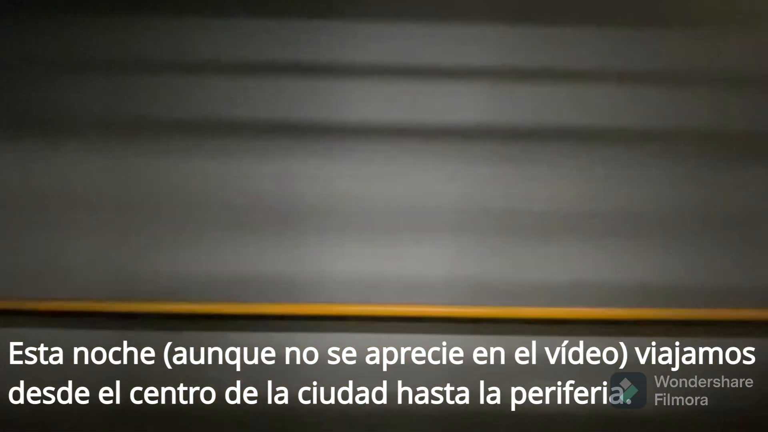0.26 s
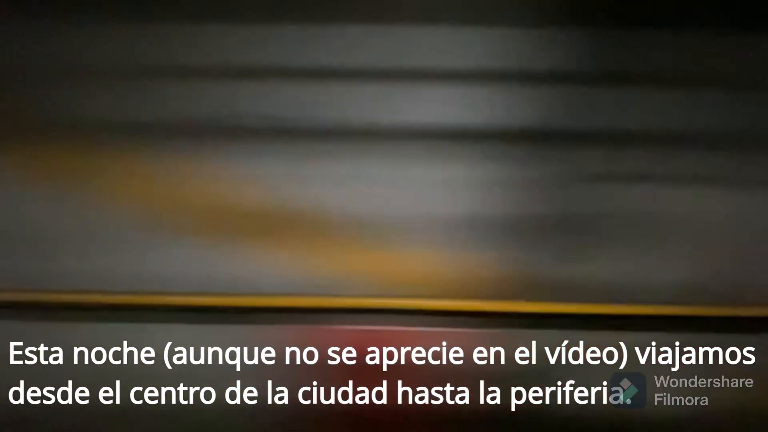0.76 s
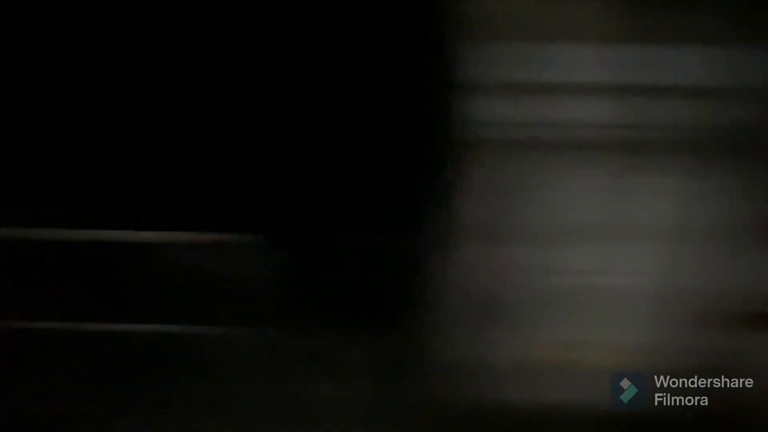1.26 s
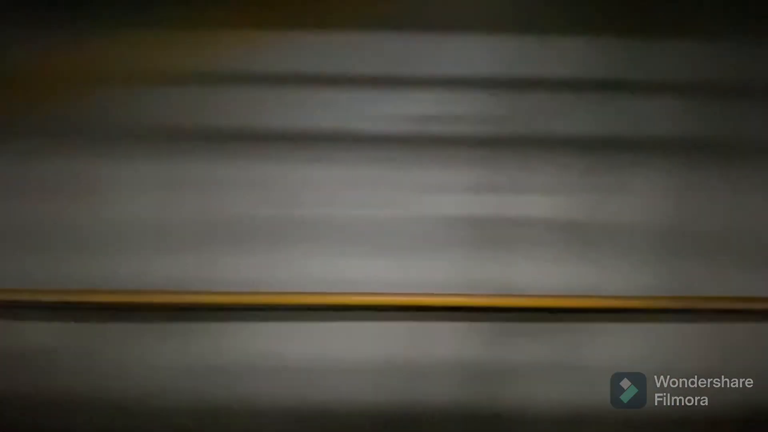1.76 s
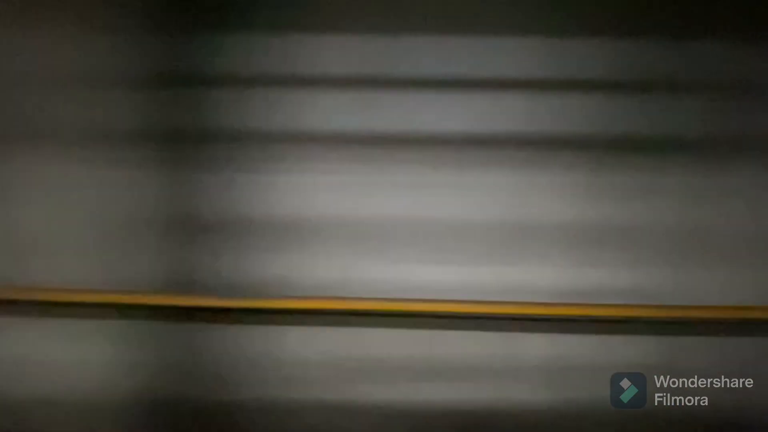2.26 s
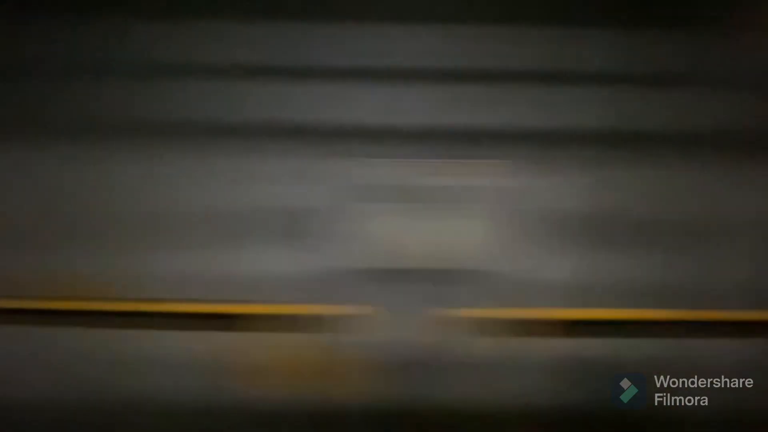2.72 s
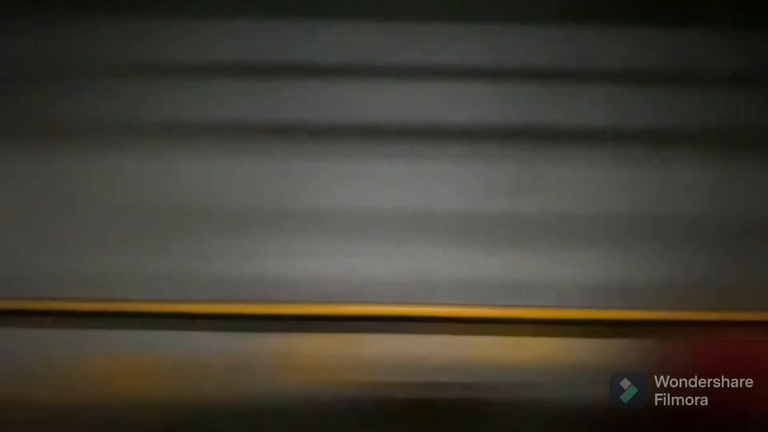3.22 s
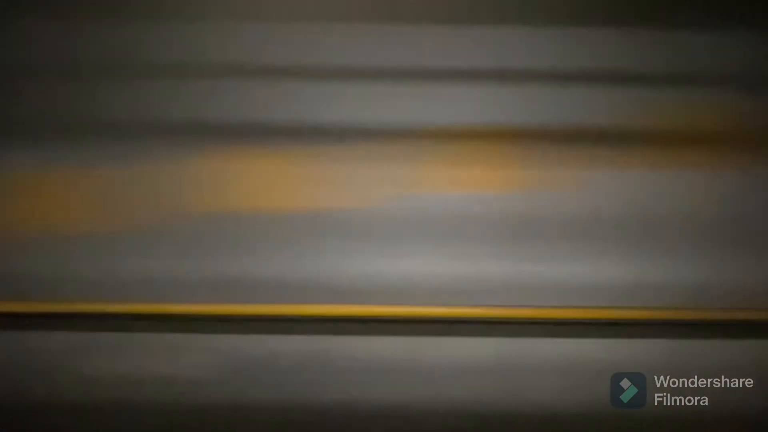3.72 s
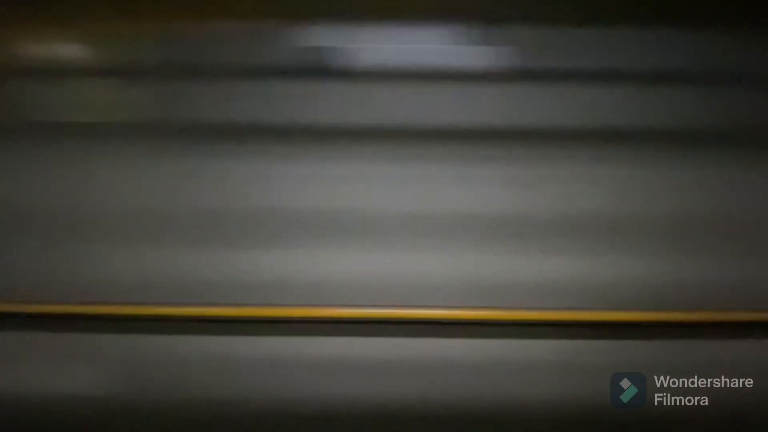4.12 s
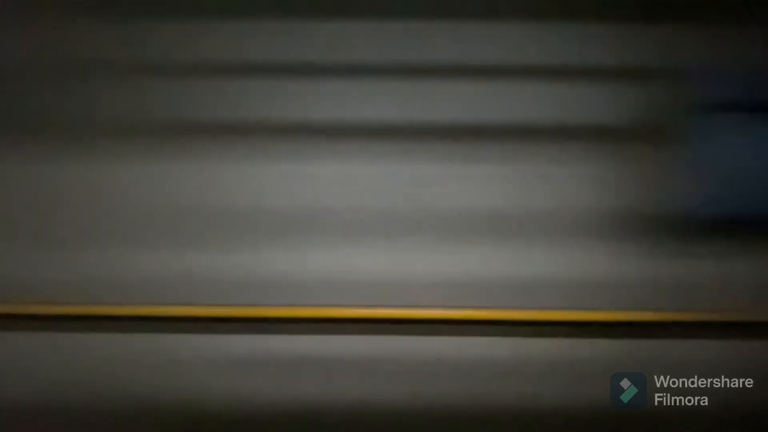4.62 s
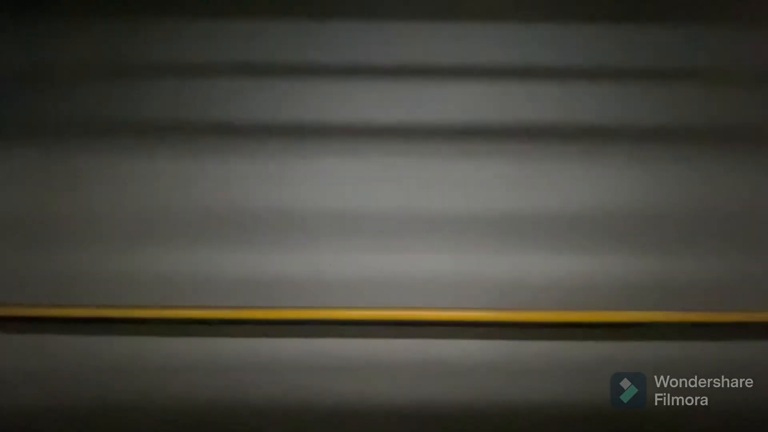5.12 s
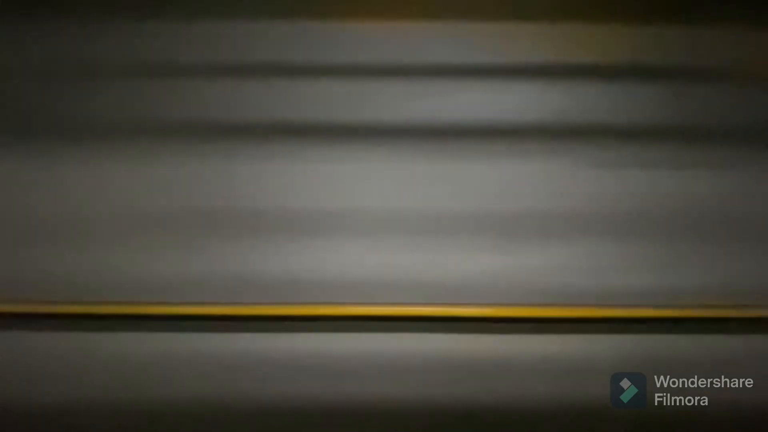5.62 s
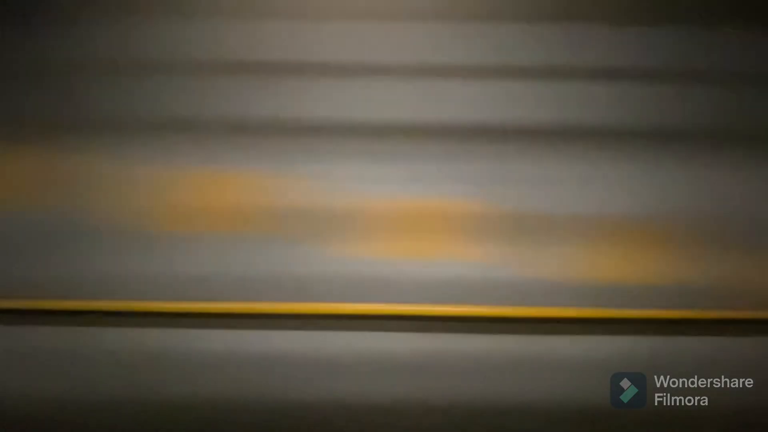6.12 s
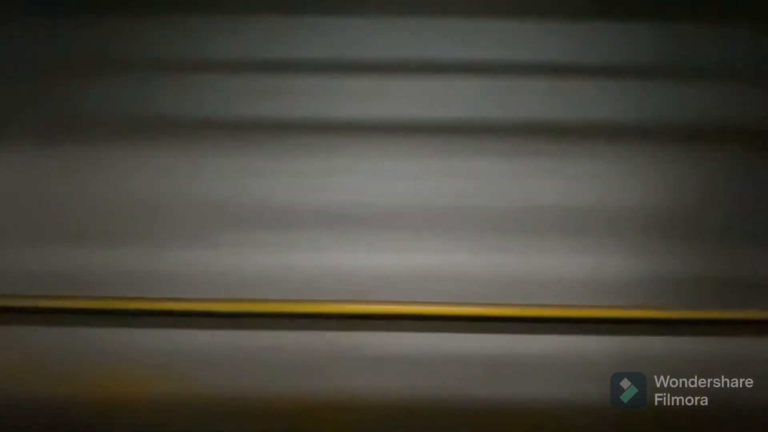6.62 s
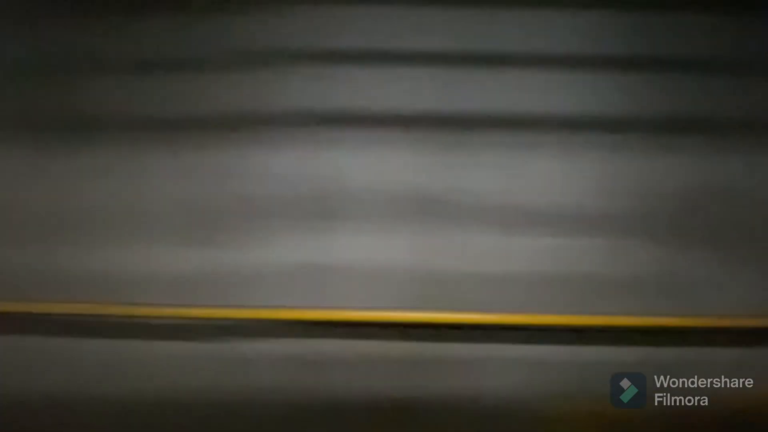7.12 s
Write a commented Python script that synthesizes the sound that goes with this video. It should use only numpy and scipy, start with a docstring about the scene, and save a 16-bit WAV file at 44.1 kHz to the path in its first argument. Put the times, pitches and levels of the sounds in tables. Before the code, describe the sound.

A subway train runs fast through a tunnel, heard inside the carriage from a handheld stereo microphone near the window. From 0 s to the end, about 7.4 s, a loud, dense roar of rough wheels on rails never stops. Its weight is in the low mids: floor, doors and panels ring as blurred, hollow drones that waver in pitch and swell irregularly, with weaker deep rumble below. Above lies a quieter airy hiss, flickering quickly as the tunnel wall throws it back. Around 1.1 s an opening passes, the boxy floor and door ringing dips and lower rumble shows briefly. Near 3 to 4 s the floor tone leans higher, then settles. A very faint, high flange squeak comes at 3.3 s, another at 5.8 s, and a clearer, rough metallic squeal at 6.4 s, leaning left, dropping in pitch and ringing on briefly. The roar continues to the cut.

```python
"""Inside a subway carriage in a tunnel, a two-port phone held at the window.
From the start, rough wheels on rough rails shake bogie, floor and panels: noise through drifting resonances,
over a broad roar and a flickering hiss that the tunnel wall throws back. Near 1.1 s an opening in the wall
goes by and the balance of the parts changes. Near 3.3, 5.8 and 6.4 s a wheel flange squeals briefly: narrow
noise bands that sag in pitch and ring on."""
import sys
import numpy as np
from scipy import signal
from scipy.fft import rfft, irfft, next_fast_len
from scipy.io import wavfile
from scipy.ndimage import uniform_filter1d, minimum_filter1d, map_coordinates

SR = 44100
rng = np.random.default_rng(int(sys.argv[2]) if len(sys.argv) > 2 else 0)


def store_pcm(level_fs):
    """Save levels as 16-bit WAV."""
    pcm = np.round(np.clip(level_fs, -1, 1) * 32767).astype(np.int16)
    wavfile.write(sys.argv[1], SR, np.atleast_2d(pcm).T)


N = 325017  # samples

# Modes of each part. Each row: centre in Hz, width in Hz, level within the part in dB.
BOGIE = [(79.3, 17, 0.5), (67, 13, -7.5)]
UNDERFRAME = [(130, 56, 0)]
AXLES = [(163.5, 26, 0)]
LOW_FLOOR = [(251, 44, -5.5), (286.1, 46.5, -0.5)]
HIGH_FLOOR = [(328.2, 18.8, 0), (349.6, 26, -6)]
DOORS = [(387.7, 62, 0)]
PANELS = [(507, 74, 0)]
UPPER_PANELS = [(574.4, 77, 0)]
WINDOW = [(648, 89, 0)]
RAILS = [(786, 74, -1.3), (833, 95, -0.23)]
MID_RAILS = [(982, 95, -1.5), (1045.5, 85, 0)]
HIGH_RAILS = [(1260, 140, 0)]
WHEELS = [(1489, 240, 0)]
# How hard each part rings. Each row: modes, level midway in dB, drift in dB per s, dB per dB of wall level,
# dB per unit of floor lean, dB added at the opening.
PARTS = {"bogie": (BOGIE, -42, -1.7, .1, .3, 1.5), "low floor": (LOW_FLOOR, -20.5, -0.35, 0.35, -2.5, -1.8),
         "high floor": (HIGH_FLOOR, -21.5, -0.11, 0.38, 3.2, -5.5),
         "doors": (DOORS, -27, -1.1, 0.71, 0.27, -3.5), "walls": (PANELS, -31, -0.49, .6, -1.6, .3),
         "upper walls": (UPPER_PANELS, -32.5, -0.8, 0.66, -1.4, .3),
         "rails": (RAILS, -30.5, -0.6, 1, -1.2, -1.3), "mid rails": (MID_RAILS, -34, -0.6, 0.83, .3, 1.3),
         "high rails": (HIGH_RAILS, -37.5, -0.46, 0.79, -0.3, .3),
         "wheels": (WHEELS, -42, 0.92, .8, .3, -.3), "underframe": (UNDERFRAME, -43.5, -0.52, .1, -.6, 13),
         "axles": (AXLES, -42.5, -.2, .1, .3, 2.5), "window": (WINDOW, -37, 0.38, .6, 3.4, -0.33)}
# Swells of one part: its ringing grows louder for a moment.
# Each row: centre in seconds, half length in seconds, part, swell in dB.
SWELLS = [(0.75, 0.2, "bogie", 4.5), (3.6, .25, "bogie", 2), (2.7, 0.072, "high floor", 3.5),
          (3.62, 0.12, "high floor", 1), (4.5, .08, "high floor", 3.5), (4.3, .15, "high floor", 1.5),
          (6.1, 0.27, "high floor", 2.5), (7.1, 0.22, "high floor", 0), (.4, 0.3, "rails", 2),
          (2.3, .25, "rails", 2.5), (2.3, .3, "mid rails", 2), (4.7, .25, "mid rails", 1.5),
          (5.1, .3, "high rails", 4.5), (6.7, .25, "high rails", 1), (0.59, 0.52, "upper walls", 3),
          (5.7, .3, "upper walls", 5), (1.8, .3, "low floor", 1.5), (3.0, 0.25, "axles", 3),
          (0.49, 0.32, "low floor", 3), (2.7, 0.13, "low floor", 3), (1.3, 0.27, "doors", 4.5),
          (2.45, 0.62, "doors", 5.5), (6.76, 0.31, "doors", 6.5), (7.27, 0.32, "doors", 6),
          (0.28, 0.26, "doors", 2.5), (7.1, .25, "low floor", 1.5), (2.1, 0.32, "bogie", 3.5),
          (2.45, 0.39, "walls", 3), (5.6, 0.23, "walls", 2), (5.3, 0.3, "rails", 3.5),
          (6.85, .5, "wheels", 3.5), (3.9, 0.25, "window", 3.5), (5.1, .25, "window", 6),
          (5.6, .4, "underframe", 1.5)]
# Pitch of some parts along the ride. Each row: time in seconds, shift in percent.
GLIDES = {"upper walls": [(0, 2), (.6, 0), (1.3, -3), (2.3, -4), (3.3, 5), (5.6, 8), (7.37, 3)],
          "rails": [(0, 1), (1.3, -3), (2.1, 2), (2.9, -3), (3.8, 2), (5.3, 1), (6.5, 0), (7.37, 1.5)],
          "mid rails": [(0, 3), (1.5, 4), (2.1, -1), (3.1, -1), (4.1, 1), (4.7, -1), (7.37, -1)],
          "high rails": [(0, 1), (1.2, -1.5), (2.5, 0), (4.7, 1.5), (5.5, 0), (7.37, 1)],
          "high floor": [(0, 0.94), (3.1, 1.42), (3.9, -1), (4.4, 2), (7.37, 0.014)], "bogie": [(0, 0),
          (.6, 1), (1.1, -6), (1.6, 1), (2.3, 1), (2.7, -7), (3.5, 2), (7.37, 0.5)]}
MIDWAY_S = 3.7
OPENING_S, OPENING_HALF_S = 1.12, 0.17  # centre, half length


def ringing_parts(wall_db, lean):
    """Each part rings at a level set by drift, wall, floor lean, opening and swells."""
    since_midway_s = np.arange(N) / SR - MIDWAY_S
    opening = bump(OPENING_S, OPENING_HALF_S)
    mix = 0
    for name, (modes, db, drift_db_per_s, wall_share, lean_db, opening_db) in PARTS.items():
        level_db = db + drift_db_per_s * since_midway_s + wall_share * wall_db
        level_db = level_db + lean_db * lean + opening_db * opening
        for at_s, half_s, part, swell_db in SWELLS:
            if part == name:
                level_db = level_db + swell_db * bump(at_s, half_s)
        shift_percent = in_time(GLIDES[name])[0] if name in GLIDES else 0
        mix = mix + undb(level_db) * glide(ring(modes), shift_percent)
    return mix


def ring(modes):
    """Every mode of a part swells and wavers on its own, by chance."""
    total = 0
    for hz, width_hz, db in modes:
        waver_db = .6 * walk(2.49) + 0.95 * walk(8) + .7 * walk(19)
        total = total + undb(db + waver_db) * mode(hz, width_hz)
    return unit(total)


def mode(center_hz, width_hz, size=N):
    """Noise through one resonance with steep flanks."""
    return shaped(lambda hz: 1 / (1 + ((hz - center_hz ** 2 / hz) / width_hz) ** 2), size)


WAVER_PERCENT, WAVERS_PER_S = 1.2, 5


def glide(pair, percent):
    """Reading faster or slower shifts the pitch by this much, wavering around it."""
    speed = 1 + (percent + WAVER_PERCENT * walk(WAVERS_PER_S)) / 100
    place = np.cumsum(speed)
    return np.array([map_coordinates(v, [place], order=1, mode="mirror") for v in pair])


# Roar under the modes. Each row: frequency in Hz, relative density in dB per Hz.
ROAR = [(20, -34.5), (48, -4), (100, -11.5), (140, -6), (190, 1.5), (450, 2), (680, -1), (1100, -3.5),
        (1500, -16), (2400, -51.5), (15000, -100)]
ROAR_DB = -25.5


def roar(wall_db):
    """Broad rolling noise that swells with the hiss: both come back from the tunnel wall."""
    return undb(ROAR_DB + 0.98 * wall_db) * coloured(ROAR)


# Wheel and air noise back from the wall. Each row: frequency in Hz, relative density in dB per Hz.
HISS = [(900, -24.5), (1400, -10.5), (1750, -6), (2100, -5.5), (2600, -16), (3000, -19), (3250, -14.5),
        (3700, -25.5), (4400, -22.5), (5500, -28.5), (7500, -31.5), (9000, -37.5), (10500, -40.5),
        (15000, -59)]


def hiss(hiss_db):
    """Wheel and air noise thrown back by the wall, flickering overall and band by band."""
    return undb(hiss_db + .5 * flicker(10)) * gusty(coloured(HISS))


# Hiss bands that flicker alone. Each row: low edge in Hz, high edge in Hz, flickers per s, depth in dB.
GUSTS = [(1300, 1710, 9.9, 2.5), (1760, 2300, 9, 1.1), (2320, 2900, 9, 0.85), (2900, 3600, 9, 0.85),
         (3620, 4600, 10, 1.1), (4600, 5400, 10, 0.9), (6000, 8500, 12, 1.3), (8500, 9700, 14, 1.5),
         (9700, 11000, 14, 1.5), (11000, 12400, 14, 1.5)]


def gusty(noise):
    """Gusts past the window make each band of the hiss flicker alone."""
    out = noise
    for low_hz, high_hz, rate_per_s, depth_db in GUSTS:
        sos = signal.butter(2, [low_hz, high_hz], "band", fs=SR, output="sos")
        band = signal.sosfiltfilt(sos, noise)
        out = out + (undb(depth_db * flicker(rate_per_s)) - 1) * band
    return out


# Tunnel ride. Each row: time in seconds, level thrown back by the wall in dB,
# lean of the floor ring: negative favours its low modes, positive its high modes.
RIDE = [(0, -37.5, -0.17), (.55, -37, -0.87), (.9, -39, -0.83), (1.5, -38, -.4), (2.05, -40, -0.77),
        (2.6, -38.5, -0.23), (3.0, -39, 0.9), (3.5, -39.5, 1.3), (4.2, -39, 0.7), (4.7, -38.5, -0.09),
        (5.1, -40, 0.05), (5.6, -38, 0.076), (6.1, -39, -0.27), (6.6, -39.5, -0.33), (7.37, -40, -0.39)]


def carriage():
    """Parts, roar and hiss as two unrelated mixes of reflections."""
    hiss_db, lean = in_time(RIDE)
    wall_db = hiss_db - hiss_db.mean()
    return ringing_parts(wall_db, lean) + roar(wall_db) + hiss(hiss_db)


# Flange squeals. Each row: start in seconds, hold in seconds, centre in Hz, width in Hz, level in dB,
# left minus right in dB.
SQUEALS = [(3.24, 0.051, 8900, 420, -69, -5), (5.81, .04, 8800, 420, -64, -4),
           (6.364, 0.11, 7430, 300, -50.5, 6), (6.442, .02, 6760, 200, -62, 9),
           (6.468, 0.035, 4450, 600, -55.5, 10), (6.46, 0.018, 5900, 900, -61, 5)]
# Wheel modes in a squeal. Each row: offset in squeal widths, level in dB. Then mode width as share of squeal width.
SQUEAL_MODES, SQUEAL_MODE_SHARE = [(-.42, -2.5), (0, 3), (.4, -3)], .3
SQUEAL_RISE_S, SQUEAL_FALL_S = .028, .06  # fall: time per 20 dB
SQUEAL_TAIL_DB, SQUEAL_TAIL_S = -9, .25  # tail: time per 20 dB
SQUEAL_TAIL_SHIFT, SQUEAL_TAIL_SPREAD = -.5, 1.6  # in squeal widths: lower, more blurred
SQUEAL_SAG_PER_S = .04  # share of pitch lost per s


def squeals():
    """Stick-slip at the flange: close, rough wheel modes swell, hold, sag and die in the tunnel."""
    out, size = np.zeros((2, N)), SR // 2
    t = np.arange(size) / SR
    sagging_place = (t - SQUEAL_SAG_PER_S * t ** 2 / 2) * SR
    for start_s, hold_s, hz, width_hz, db, pan_db in SQUEALS:
        after_s = np.maximum(t - SQUEAL_RISE_S - hold_s, 0)
        rise = np.clip(t / SQUEAL_RISE_S, 0, 1) ** 2
        wheel = 0
        for offset, mode_db in SQUEAL_MODES:
            wheel = wheel + undb(mode_db) * mode(hz + offset * width_hz, SQUEAL_MODE_SHARE * width_hz, size)
        band = np.array([map_coordinates(v, [sagging_place]) for v in unit(wheel)])
        direct = rise * undb(-20 * after_s / SQUEAL_FALL_S) * band
        build = np.clip(t / (SQUEAL_RISE_S + hold_s), 0, 1)
        tail = mode(hz + SQUEAL_TAIL_SHIFT * width_hz, SQUEAL_TAIL_SPREAD * width_hz, size)
        echo = build * undb(SQUEAL_TAIL_DB - 20 * after_s / SQUEAL_TAIL_S) * tail
        side_db = np.array([[pan_db], [-pan_db]]) / 2
        start = int(start_s * SR)
        out[:, start:start + size] += undb(db + side_db) * (direct + echo)
    return out


# The two ports. Each row: frequency in Hz, likeness 0-1, left lag in ms, left minus right in dB.
PORTS = [(40, .93, .1, 0.5), (124, 0.9, .1, -0.5), (190, .58, .1, 2.5), (255, 0.87, 0.033, 2.5),
         (484, 0, 0.21, .5), (660, 0.38, 0.68, 2), (825, 0.18, 0.41, 3), (1120, 0.1, 0.043, 4),
         (1510, 0.5, 0.24, 3.5), (2050, 0.33, 0.24, 2.5), (2700, 0.9, 0.36, 0), (3200, 0.7, 0.36, 3),
         (3520, 0.6, 0.41, 1.5), (4440, 0.2, 0.37, 3.5), (4670, 0.5, 0.47, -0.5), (5300, .2, .42, 4.5),
         (7000, 0.3, .43, 2.5), (8800, 0.4, 0.45, -0.5), (11000, 0.5, 0.53, -0.5)]


def ports(pair):
    """The right port hears a share of the left's sound slightly earlier, other reflections for the rest."""
    edge = 4096  # samples of mirrored padding
    size = next_fast_len(N + 2 * edge)
    hz = np.arange(size // 2 + 1) * SR / size
    alike, lag_ms, pan_db = on_log_hz(hz, PORTS)
    alike = np.clip(alike, 0, 1)
    padded = np.pad(pair, ((0, 0), (edge, edge)), "reflect", reflect_type="odd")
    left, other = rfft(padded, size)
    early = left * np.exp(2j * np.pi * hz * lag_ms / 1000)
    right = alike * early + np.sqrt(1 - alike ** 2) * other
    return irfft([left * undb(pan_db / 2), right * undb(-pan_db / 2)], size)[:, edge:edge + N]


def undb(db):
    """Amplitude from dB."""
    return 10 ** (np.asarray(db) / 20)


def unit(x):
    """Scale to rms 1."""
    return x / np.sqrt(np.mean(x ** 2))


def on_log_hz(hz, table):
    """Columns of a (Hz, ..) table, joined by straight lines on a log-frequency axis."""
    at_hz, *columns = np.transpose(table)
    return [np.interp(np.log(hz + 1), np.log(at_hz), c) for c in columns]


def in_time(table):
    """Columns of a (s, ..) table, one value a sample."""
    at_s, *columns = np.transpose(table)
    return [np.interp(np.arange(N) / SR, at_s, c) for c in columns]


def shaped(gain, size=N):
    """Two unrelated noises through one spectrum, rms 1."""
    fast = next_fast_len(size)
    hz = np.arange(fast // 2 + 1) * SR / fast
    real, imag = rng.standard_normal((2, 2, len(hz)))
    return unit(irfft((real + 1j * imag) * gain(hz + 1), fast)[:, :size])


def coloured(table):
    """Two unrelated noises with a tabled spectrum."""
    return shaped(lambda hz: undb(on_log_hz(hz, table)[0]))


def walk(rate_per_s):
    """Random levels at this rate, joined and slewed; spread near 1."""
    step = int(SR / rate_per_s)
    count = N // step + 2
    joined = np.interp(np.arange(N) / step, np.arange(count), rng.standard_normal(count))
    return 1.62 * uniform_filter1d(joined, step)


def flicker(rate_per_s):
    """A walk without its slow drift."""
    quick = walk(rate_per_s)
    return quick - uniform_filter1d(quick, SR // 3)


def bump(at_s, half_s):
    """A smooth rise and fall around a moment, 1 at the top."""
    return np.exp(-((np.arange(N) / SR - at_s) / half_s) ** 2)


def scene():
    """Carriage through the ports, squeals on top."""
    return ports(carriage()) + squeals()


CEILING, TOP_HZ = .92, 12400


def record(dry):
    """The phone's limiter eases the gain down around peaks over the ceiling; then the top is cut."""
    span = int(.012 * SR)
    need = CEILING / np.maximum(np.abs(dry).max(axis=0), CEILING)
    held = minimum_filter1d(need, 2 * span + 1)
    gain = uniform_filter1d(uniform_filter1d(held, span), span)
    low_pass = signal.ellip(8, .1, 40, TOP_HZ, fs=SR, output="sos")
    return signal.sosfiltfilt(low_pass, dry * gain)


dry = scene()
out = record(dry)
store_pcm(out)
```